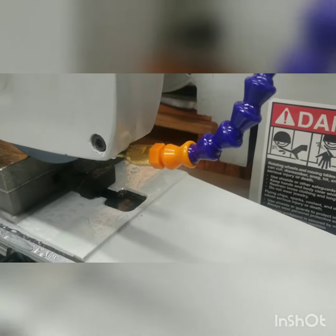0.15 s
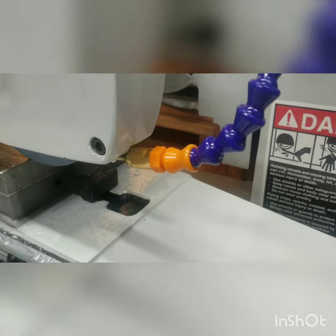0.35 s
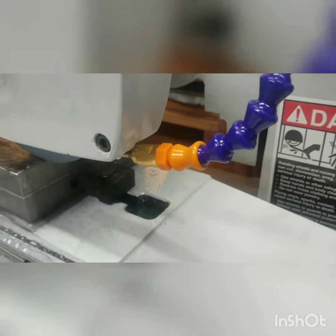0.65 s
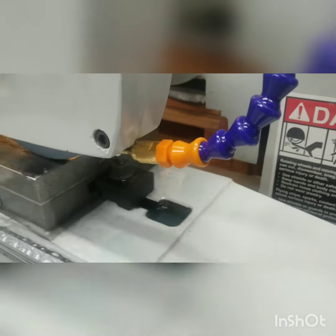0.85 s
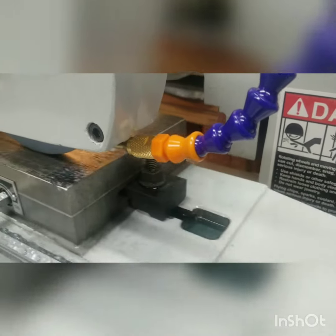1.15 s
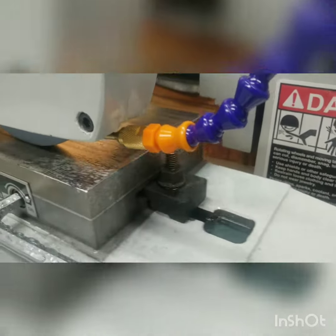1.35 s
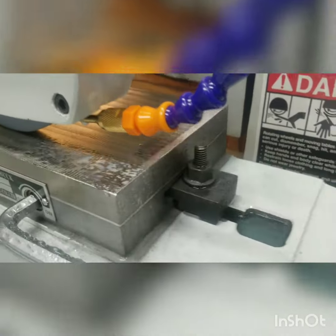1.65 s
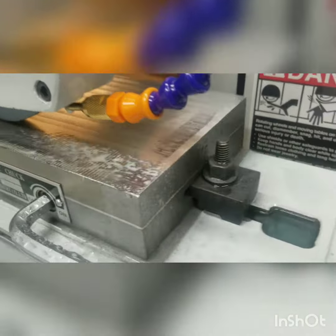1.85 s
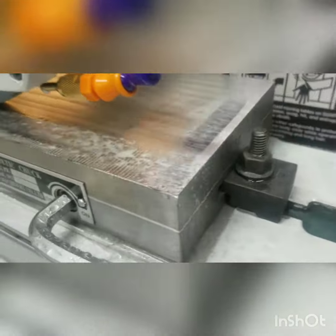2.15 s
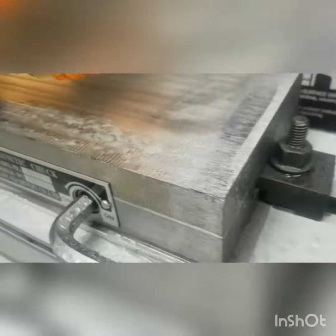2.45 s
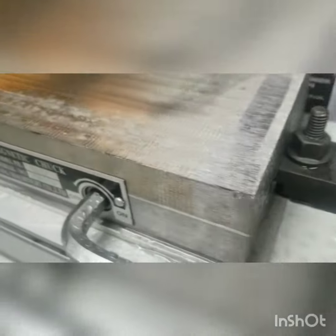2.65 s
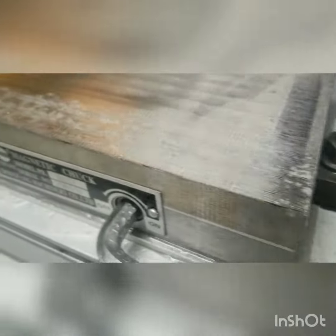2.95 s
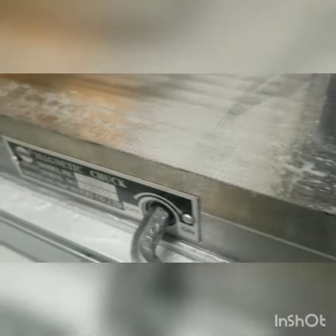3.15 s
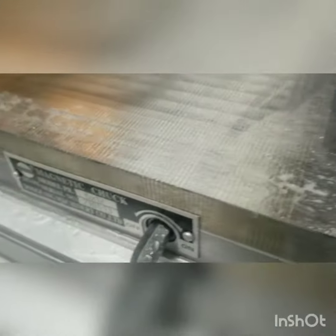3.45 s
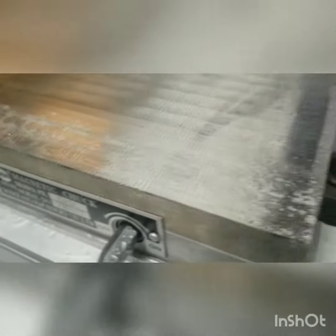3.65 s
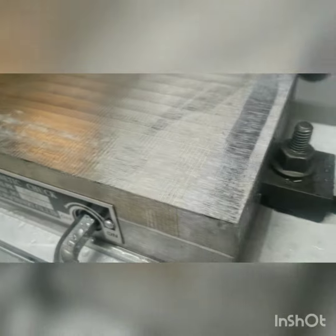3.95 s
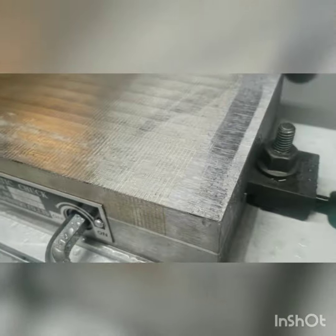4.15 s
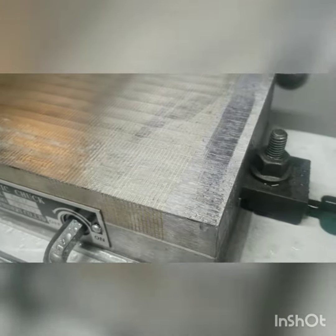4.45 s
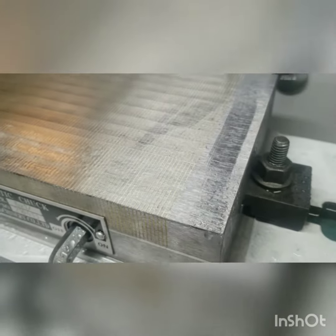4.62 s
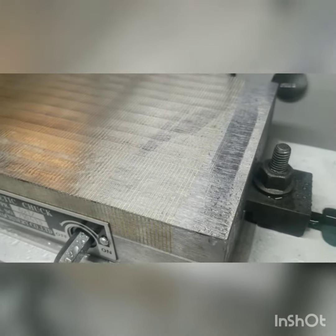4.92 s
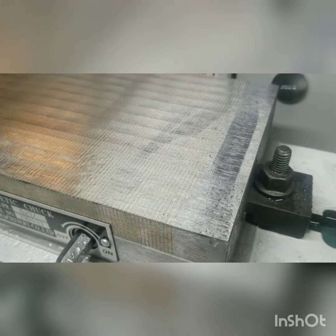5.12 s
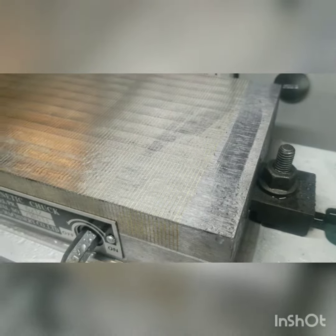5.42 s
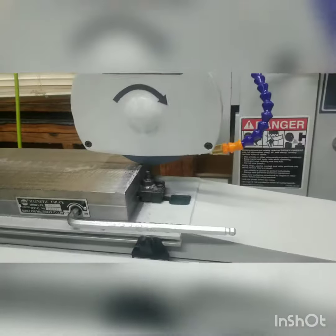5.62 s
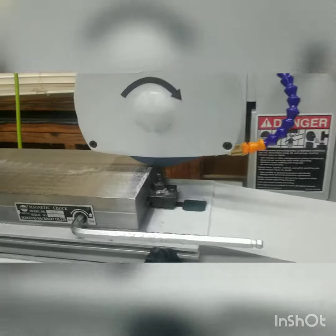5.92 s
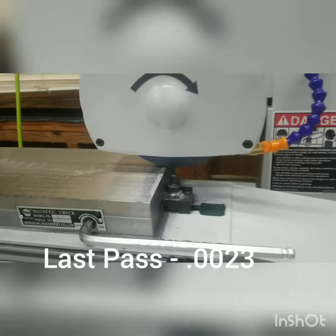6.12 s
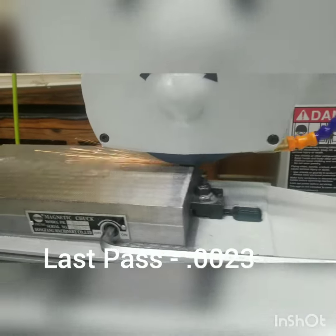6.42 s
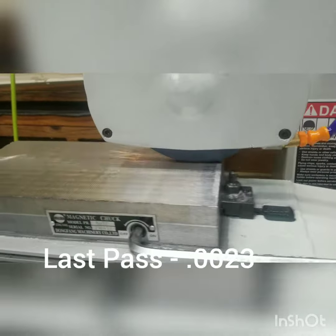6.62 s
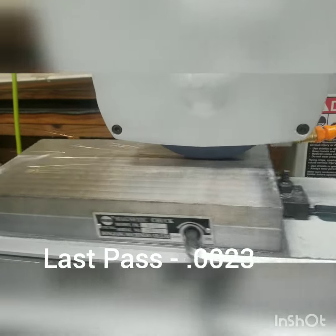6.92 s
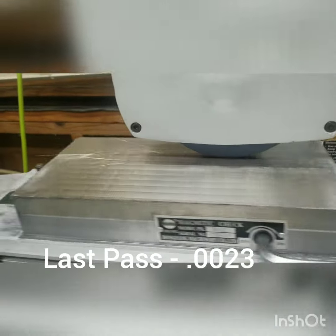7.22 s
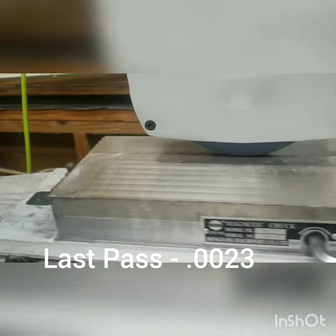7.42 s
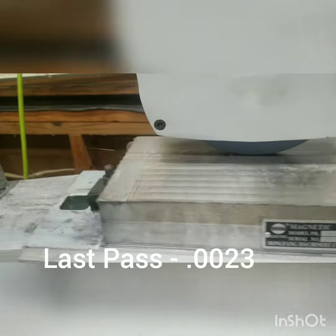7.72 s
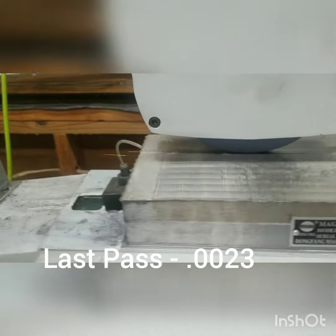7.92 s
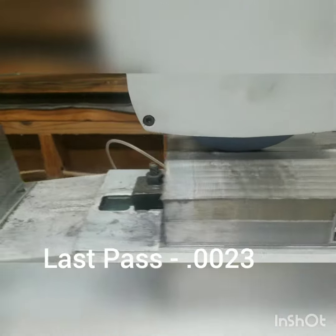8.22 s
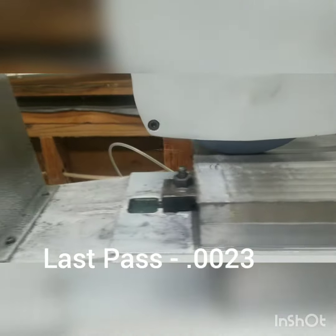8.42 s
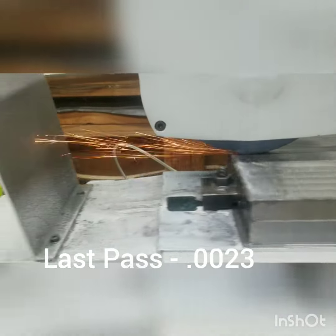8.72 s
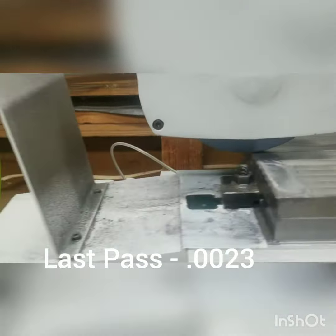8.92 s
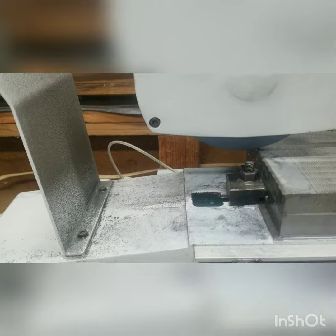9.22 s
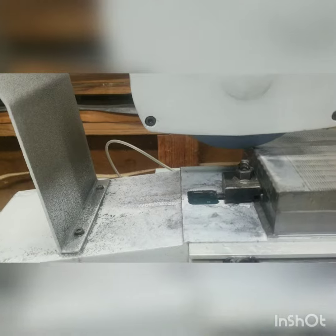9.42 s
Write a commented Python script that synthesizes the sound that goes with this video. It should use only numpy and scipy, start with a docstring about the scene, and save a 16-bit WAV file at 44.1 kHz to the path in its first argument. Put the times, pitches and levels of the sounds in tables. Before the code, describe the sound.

Close, moving stereo microphone beside a running grinding machine. Dense hiss and steady bearing whine shift in colour as the microphone turns. A table motor glides up to a thin whine and back down, with a low growl coming and going. Two long cuts add ringing, fluctuating high tones and a slight drop in spindle pitch. A blink of silence separates the two viewpoints.

```python
"""Surface grinder at work

A grinder in a workshop is heard from two places, with a very short silence between them. Shaped noise makes
the rumble, fan, wheel rush and the hiss of an air nozzle. Gliding sines make the whine of the table drive,
which rises and falls with each stroke, and a growl. More sines make the spindle's song, which sags in pitch
while the wheel cuts. Two microphone ports hear it all as the microphone moves about near the machine."""
import sys
import numpy as np
from scipy import signal
from scipy.fft import rfft, irfft, next_fast_len
from scipy.io import wavfile
from scipy.ndimage import uniform_filter1d, map_coordinates

SR = 44100
rng = np.random.default_rng(int(sys.argv[2]) if len(sys.argv) > 2 else 0)


def put_to_file(sound):
    """Save the sound as 16-bit audio at rate SR, in the file named by the first command-line argument."""
    columns = np.atleast_2d(sound).T  # one column per channel
    safe = np.clip(columns, -1, 1)
    whole_steps = np.round(safe * 32767)
    wavfile.write(sys.argv[1], SR, whole_steps.astype(np.int16))


N = 422037
TIME = np.arange(N) / SR
MOVE_S = 5.48  # change from the first place to the second
STOP_S, RESUME_S = 5.447, 5.508  # the short silence


def amp(db):
    """Gain of a level in dB."""
    return 10 ** (np.asarray(db) / 20)


def ramp(start, length, t=TIME):
    """0 before start, 1 after start + length, straight between."""
    return np.clip((t - start) / length, 0, 1)


def along(points, hz):
    """Read (f/Hz, value) points on a log frequency axis."""
    f, v = np.transpose(points)
    return np.interp(np.log(hz + 1), np.log(f + 1), v)


def curves(rows, t=TIME):
    """Read every column after the first at the places t of the first column."""
    s, *columns = np.transpose(rows)
    return np.array([np.interp(t, s, column) for column in columns])


def wobble(rate):
    """A random curve: straight lines between random points, rate points a second."""
    points = rng.standard_normal(int(N * rate / SR) + 4)
    return map_coordinates(points, [TIME * rate], order=1)


# positions of the microphone: (t/s halfway through the glide there, level/dB of each of 10 guard resonances
# before the hiss boost, level/dB of each of 3 strong bearing tones, level/dB added to the other spindle tones)
POSITIONS = [(0.0, -38, -32, -42, -35.5, -34.5, -37, -40.5, -39, -40, -37, -40, -32, -38, -1.8),
             (0.35, -36.5, -30.5, -39, -39, -32.5, -37, -42, -35.5, -39.5, -37, -42.5, -28.5, -35, -0.34),
             (0.6, -39, -32, -33, -37, -34.5, -41, -39.5, -37, -38, -34, -38, -37, -36, -1.5),
             (0.8, -39, -39, -43, -38, -28.5, -34, -39, -37, -41, -34, -36, -37, -30, 0.8),
             (1.0, -39, -37, -34, -34, -35, -40, -36, -42, -39, -38.5, -43, -41, -36, 0.77),
             (1.3, -36.5, -35.0, -37, -30.5, -39, -41.5, -36, -48, -39, -39, -43, -34.5, -30, 1),
             (1.9, -38, -33.5, -33, -41, -33, -47, -38.5, -38, -41.0, -36.0, -36, -35, -33.5, 0.2),
             (2.3, -40, -32.5, -32, -46, -31.5, -63, -38.5, -37.5, -45, -37, -37, -46, -36, -1.4),
             (2.75, -40, -34.5, -29, -36, -33, -39.5, -38.5, -39.5, -42, -37.0, -39, -53, -38.5, 0.0),
             (3.25, -40, -38, -29.5, -33.5, -38, -40, -43, -37.5, -42, -38, -40, -42.5, -48.0, -1),
             (3.8, -39, -37.5, -30.5, -34, -41, -40.5, -44, -37, -43, -41, -41.5, -50, -46, -0.9),
             (5.48, -39, -36.5, -43, -41.5, -44, -49, -42, -42.5, -43, -43, -48, -36.5, -39, -3.5),
             (6.4, -43, -39, -39, -43, -41.5, -41.5, -41, -40.5, -41, -40, -41, -34.5, -35, -1.5),
             (6.95, -37.5, -34, -35.5, -40, -40, -40.5, -40, -38, -47, -40, -35, -38, -31, -1.1),
             (7.45, -38, -34, -36.5, -42, -36, -42.5, -39.5, -41.5, -40, -42, -46, -39, -31.5, 0),
             (7.9, -39, -35.5, -35.0, -44, -39, -43.5, -40, -42, -37.5, -43.5, -47, -36.5, -34.5, 0.5),
             (8.5, -50, -32, -35.5, -38, -41, -42.5, -42.5, -43, -37, -42.5, -45, -43.5, -36.5, 1.4),
             (8.95, -49, -33, -34.5, -41, -41, -44.5, -44.5, -46.5, -49, -42.5, -44, -41.5, -36, 0.9)]
HISS, BEARING, OTHERS = slice(1, 11), slice(11, 14), slice(14, 15)  # columns of the positions
GLIDE_S = .19  # from one position to the next


def heard(columns):
    """Some columns of the positions over time: hold, then glide; the change of place is almost a jump."""
    rows = []
    for before, now in zip(POSITIONS, POSITIONS[1:]):
        half = GLIDE_S / 2 if abs(now[0] - MOVE_S) > .05 else .01
        rows.append((now[0] - half, *before[columns]))
        rows.append((now[0] + half, *now[columns]))
    return rows


# how far the left port leads before the bass is reduced: (f/Hz, phase/rad for each of 9 microphone aims)
LEAD = [(0, 0, 0.5, 0.5, -1.5, 2.5, 0.5, -1.5, -0.5, 1.5),
        (1200, 2.5, 2.2, 2.5, -2.5, 2.06, 0.8, 0.5, 1.1, -2.0),
        (2060, 5, 5, 1, -5.5, 5.5, -0.7, -0.3, -2.1, 2),
        (2612, 4.5, 4.5, -3.5, -5, 2, -2.5, -1.8, -1.5, -1.5),
        (3170, 4.5, 4, -1.5, -8, 0.9, -2, 2.5, 1.4, -2), (3476, 3.5, 7, -2, -5, -0.3, -3.5, -2, 4.5, 0.5),
        (3770, 8.0, 7.5, 3.5, -4.5, 3.5, -2, 1.5, 1.0, 1.3),
        (3900, 10, 7, -1.2, -5.5, 1.8, -0.6, 1.5, -1.4, 2.5),
        (4230, 10, 11, -0.5, -2, -3, -3, -4.5, -3.5, 2),
        (4710, 12, 14, 0.5, -3.5, -1.9, 0.5, -2, -3.5, 2.0),
        (4880, 10.5, 10.5, -2.5, -3, 0.1, 0.7, -2.5, -4, 1), (5390, 9, 7, -1.5, -1, -1, 2.1, -1, -4.5, 0.5),
        (5470, 8, 8.5, -4, -2.5, 2.5, -2.5, 2, -1.5, 3), (6355, 12.5, 7, -0.3, -0.8, -2.4, 1.5, 1, -4, 0),
        (6900, 7, 5, -3, 1.2, 1.5, -0.5, 4.5, -5, -1.5), (9700, 10.5, 2, -2, 1.1, 1.5, -2.5, 0.5, -5, -2),
        (11320, 14.5, -1, -5, 2, -6.5, -4, 3, -3, -2.5), (12170, 13.5, 2.5, -8, 5, -3.5, -5, -2, -11, 0.5),
        (13100, 16, -3, -7.5, 5, -4, -5, 0, -11.5, 3.5),
        (15200, 20, -1.5, -8, 4.5, -7.2, -0.5, -10, -11, 4)]
# turns from one aim to the next: (start t/s, length t/s)
TURNS = [(.5, .2), (.9, .25), (1.7, .4), (3.05, .45), (5.46, .03), (6.25, .2), (6.95, .25), (8.3, .3)]


def lead(hz, t):
    """Phase lead of the left port as the microphone turns; the bass comes from the front and has little."""
    aims = np.exp(1j * curves(LEAD, hz) * hz ** 2 / (hz ** 2 + 500 ** 2))
    steps = sum((b - a) * ramp(*turn, t) for a, b, turn in zip(aims, aims[1:], TURNS))
    return np.angle(aims[0] + steps)


# how alike left and right noise are: (f/Hz, likeness from 0 to 1)
ALIKE = [(40, .72), (80, .62), (150, .9), (400, .9), (800, .65), (1500, .4), (3000, .6), (5000, .74),
         (9000, .58), (15000, .62)]
RIPPLE_DB = 2.5  # depth of the treble ripples


def noise(shapes, levels, patchy_db, streaky_db):
    """Stereo noise: each spectral shape follows its level curve, with random patches, streaks and ripples."""
    hz, t, z = signal.stft(rng.standard_normal((2, N)), SR, nperseg=1024)
    power = np.array([shape(hz) ** 2 for shape in shapes])
    power = power / power.mean(axis=1, keepdims=True)
    gain = np.sqrt(power.T @ amp(curves(levels, t)) ** 2)
    white = rng.standard_normal((4, *z.shape[1:]))

    # patches come and go; their slow swells are taken out
    patches = uniform_filter1d(uniform_filter1d(white[0], size=12, axis=0), size=10, axis=1)
    patches = patches - uniform_filter1d(patches, size=36, axis=1)

    # echoes from near surfaces: narrow, longer streaks, a little different in each port, without broad swells
    streaks = white[1:3] + white[1:3].sum(axis=0)
    streaks = uniform_filter1d(uniform_filter1d(streaks, size=2, axis=1), size=50, axis=2)
    streaks = streaks - uniform_filter1d(streaks, size=9, axis=1)
    gain = gain * amp(patchy_db * patches / patches.std() + streaky_db * streaks / streaks.std())

    # wider ripples drift slowly in the treble
    ripples = uniform_filter1d(uniform_filter1d(white[3], size=9, axis=0), size=40, axis=1)
    ripples = ripples - uniform_filter1d(ripples, size=36, axis=0)
    treble = ramp(7000, 2500, hz)[:, None]
    gain = gain * amp(RIPPLE_DB * treble * ripples / ripples.std())

    # mix a shared and an opposite part to get the likeness, then shift the phase of one port
    spread = np.arccos(np.clip(along(ALIKE, hz), 0, 1))[:, None] / 2
    mid, side = z[0] * np.cos(spread), z[1] * np.sin(spread)
    shift = np.exp(1j * lead(hz[:, None], t[None]))
    ports = gain * np.array([(mid + side) * shift, mid - side])
    return signal.istft(ports, SR, nperseg=1024)[1][:, :N]


def tone(hz, db, near_hz, waver_db, rate=5):
    """A stereo sine wavering apart in each port; the phase between them follows the lead and drifts at random."""
    phase = 2 * np.pi * (np.cumsum(hz) / SR + rng.random())
    steps = TIME[::256]
    half = np.interp(TIME, steps, np.unwrap(lead(near_hz, steps))) / 2
    half = half + .25 * wobble(1.2) * near_hz / (near_hz + 1500)
    ports = [amp(db + waver_db * wobble(rate)) * np.sin(phase + side * half) for side in (1, -1)]
    return np.sqrt(2) * np.array(ports)


# passes of the wheel over the steel: (enters t/s, leaves t/s, early sag f/Hz, late sag f/Hz)
CUTS = [(.6, 3.05, 2.5, 1.6), (6.32, 8.75, 3.7, 1.9)]
FREE_HZ, FULL_SAG_HZ = 288.45, 1.5  # ball pass rate running free; the drop that counts as full load
SAG_S, RECOVER_S = .16, .2


def ball_pass():
    """Ball pass rate of the bearing: it sags as the wheel enters, creeps back, recovers as the wheel leaves."""
    rate = FREE_HZ
    for enters, leaves, early, late in CUTS:
        sag = early + (late - early) * ramp(enters, leaves - enters)
        rate = rate - sag * ramp(enters, SAG_S) * (1 - ramp(leaves, RECOVER_S))
    return rate


def load():
    """0 running free, 1 cutting: the motor slips more under the cut."""
    return np.clip((FREE_HZ - ball_pass()) / FULL_SAG_HZ, 0, 1)


# noise spectra of floor, machine base, fan and wheel; only the shape counts: (f/Hz, relative level/dB)
FLOOR = [(15, -38), (30, -20), (60, -7), (100, -10.5), (150, -9), (200, -8), (300, -120)]
BASE = [(100, -62), (160, -21.5), (227, -1.5), (318, -6.5), (409, -1), (500, -14.5), (650, -25),
        (1100, -120)]
FAN = [(250, -61), (450, -1.5), (550, -3.5), (800, -2.5), (1200, -6), (1450, -16), (2500, -27)]
RUSH = [(900, -66), (1300, 6), (1560, 12.5), (1780, 6), (2200, 11.5), (2450, 11.5), (3000, 11), (7000, -42),
        (8300, -41), (10000, -29), (16500, -31)]
# one row each for floor, base, fan and rush, before the boost: (level/dB at first place, level/dB at second)
MOTOR_LEVELS = [(-66, -67.5), (-49, -50), (-47.5, -47.5), (-45, -46.5)]
# extra just after the change of place: (level/dB of floor, of base, of fan, of rush)
SETTLE = (10, -4, 0.5, 0)
SETTLE_S = 0.98  # time in which the extra fades


def motor():
    """Rumble of floor and base, the fan and the wide rush of the wheel, all as shaped noise."""
    shapes = [lambda f, s=s: amp(along(s, f)) for s in (FLOOR, BASE, FAN, RUSH)]
    first, second = np.transpose(MOTOR_LEVELS)
    levels = [(STOP_S, *first), (RESUME_S, *(second + SETTLE)), (RESUME_S + SETTLE_S, *second)]
    return amp(8.0) * noise(shapes, levels, patchy_db=1.2, streaky_db=2.0)  # 8 dB boost


# table strokes, one list for each place: (starts t/s, stands still t/s, full whine f/Hz, braking t/s,
# level/dB gaining speed, level/dB at full speed, level/dB braking)
STROKES = [
    [(.14, 3.49, 4003, .47, -39.5, -45, -46), (3.53, 6.5, 2003, .47, -42.5, -38.5, -39)],
    [(4, 6.01, 2003, .9, -39.5, -39.5, -38), (5.883, 9.24, 4003, .47, -42, -50, -46),
     (9.256, 12, 2003, .47, -42, -42, -42)],
]
RISE_S, RISE_HZ = .72, 4003  # time to reach this whine; other times go with the root of the full whine
WAKE_SHARE, WAKE_DB = .4, 40  # a starting drive is softer below this share of speed; dB per full speed
DIP_S, DIP_WIDTH_S, DIP_DB = 4.82, .22, -12  # the steady whine dips briefly: centre, half its length, depth


def table_travel():
    """Whine pitch and level of the drive: each stroke gains and loses speed along an S-curve."""
    def ease(u):
        return u * u * (3 - 2 * u)

    hz, db = np.zeros(N), np.zeros(N)
    for here, strokes in zip((TIME < MOVE_S, TIME >= MOVE_S), STROKES):
        for start, stop, top, brake, rise_db, full_db, brake_db in strokes:
            up = ease(ramp(start, RISE_S * np.sqrt(top / RISE_HZ)))
            down = ease(ramp(stop - brake, brake))
            level = rise_db + (full_db - rise_db) * up ** 10
            level = level + (brake_db - full_db) * np.minimum(4 * down, 1)
            level = level + WAKE_DB * np.minimum(up - WAKE_SHARE, 0)
            whine_hz = top * up * (1 - down)
            fastest = here & (whine_hz > hz)  # where strokes overlap, the higher whine wins
            hz, db = np.where(fastest, whine_hz, hz), np.where(fastest, level, db)
    dip = np.clip(2 - 2 * np.abs(TIME - DIP_S) / DIP_WIDTH_S, 0, 1)
    return hz, np.where(hz > 0, db, -90) + DIP_DB * dip


# the whine and its multiples: (multiple, relative level/dB at steady speed)
DRIVE_ORDERS = [(1, 0), (2, -2), (3, -13)]
# resonances of the drive's case: (f/Hz, width f/Hz, relative level/dB)
DRIVE_CASE = [(600, 90, 0), (760, 90, 0), (930, 120, -6), (1650, 100, 2.5), (1860, 90, -3), (2030, 160, 0),
              (2200, 150, 2), (2620, 300, 0), (4003, 400, 0)]
# spells in which the feed screw growls: (from t/s, to t/s, level/dB at start, level/dB at end)
GROWLS = [(0.124, 0.28, -47, -43), (0.76, 1.898, -40, -47), (2.385, 3.6, -50.5, -49),
          (6.49, 6.954, -48, -47.5), (7.747, 9.036, -47, -43.5)]
GROWL_REST_DB, GROWL_EDGE_S = -57.5, 0.037  # level between spells; time to come and go


def drive():
    """The whine and its multiples light up as they cross the resonances of the case; the screw growls."""
    def case_db(f):
        bumps = sum(amp(2 * g) / (1 + (2 * (f - c) / w) ** 4) for c, w, g in DRIVE_CASE)
        return 10 * np.log10(bumps + .025)

    hz, db = table_travel()
    # while the table gains or loses speed the motor cogs: pitch and level turn rough, the multiples fall back
    rough = np.clip(np.abs(np.gradient(hz)) * SR / 2000, 0, 1)
    hz = hz + 40 * rough * wobble(120)
    db = db + 3 * rough * wobble(50)
    whine = 0
    for multiple, relative_db in DRIVE_ORDERS:
        level = db + relative_db * (1 + 2 * rough) + case_db(multiple * hz)
        whine = whine + tone(multiple * hz, level, 350, waver_db=1.7, rate=14)

    growl_db = GROWL_REST_DB
    for start, end, first, last in GROWLS:
        above_rest = first + (last - first) * ramp(start, end - start) - GROWL_REST_DB
        present = ramp(start - GROWL_EDGE_S, GROWL_EDGE_S) - ramp(end, GROWL_EDGE_S)
        growl_db = growl_db + above_rest * present
    growl = tone(221 + 1.67 * wobble(7.2), growl_db, 150, waver_db=0.2)
    return whine + growl


# resonances of guard and chuck that colour the air jet: (f/Hz, width f/Hz)
GUARD = [(3550, 800), (4200, 620), (4810, 420), (5330, 470), (6050, 900), (6900, 700), (10300, 2000),
         (12100, 1700), (13600, 1400), (15200, 1800)]
FLUTTER_HZ = 237.4  # middle rate of the nozzle's own flutter
SHAFT_SHARE = 1 / 4.853  # shaft turns per ball pass


def air_jet():
    """Hiss in the guard's resonances; the nozzle flutters, the wheel, never quite round, throbs once a turn."""
    # many close modes merge into broad, flat-topped bands with steep flanks
    shapes = [lambda f, c=c, w=w: (1 + (2 * (f - c) / w) ** 4) ** -.5 for c, w in GUARD]
    hiss = amp(4.0) * noise(shapes, heard(HISS), patchy_db=1.36, streaky_db=3)  # 4 dB boost
    flutter_phase = 2 * np.pi * np.cumsum(FLUTTER_HZ + .5 * wobble(3.7)) / SR
    flutter = np.where(TIME < MOVE_S, .22, .02) * np.sin(flutter_phase)
    turn = 2 * np.pi * np.cumsum(ball_pass() * SHAFT_SHARE) / SR
    throb = (0.018 + 0.025 * load()) * np.sin(turn)
    return hiss * (1 + flutter + throb) * amp(0.54 * wobble(9))


# orders of shaft and bearing with their sidebands, before the change with position: (f/Hz running free,
# level/dB free and level/dB cutting at the first place, level/dB free and level/dB cutting at the second)
TONES = [(59.4, -63, -61, -70, -69), (119, -64, -66, -70, -80), (357, -48, -47, -45, -48),
         (379, -50, -63, -69, -67), (475, -70, -62, -68, -49), (534, -71, -51, -62, -48),
         (1154, -47, -52, -48, -48), (1190, -50, -52, -46, -49), (1248, -59, -53, -54, -52),
         (1307, -55, -50, -59, -52), (1960, -48, -55, -51, -49), (2079, -47, -51, -46, -52),
         (2189, -62, -49, -65, -56), (2248, -55, -49, -51, -52), (2538, -52, -50, -49, -45),
         (2596, -51, -51, -52, -52), (2656, -50, -50, -48, -44), (2801, -57, -58, -51, -48),
         (2826, -66, -60, -54, -48), (2885, -54, -54, -47, -46), (2944, -55, -51, -47, -46),
         (3810, -48, -48, -45, -47), (4039, -48, -43, -46, -48), (4963, -44, -42, -42, -47),
         (5422, -46, -43, -46, -52)]
# hum of the motor frame, the seventh shaft order and a tone just above it: same columns as the tones
HUM = [(416, -37, -40, -42, -36), (430, -45, -54, -39, -51)]
# change of the hum from start to end of each pass: (level/dB in the first, level/dB in the second)
HUM_FADES = (-2, 0)
# the three strongest bearing tones: (multiples of the ball pass rate)
BEARING_ORDERS = (11, 12, 13)
# tones only loud while the wheel cuts, before the bite:
# (f/Hz at free speed, level/dB at the first place, level/dB at the second)
WHEEL = [(3860, -43, -43), (3920, -34, -35), (3979, -41, -35), (6463, -45, -55), (6523, -43, -46),
         (6594, -56, -43), (7010, -66, -42), (9682, -53, -46), (10276, -51, -56), (11464, -66, -52),
         (11584, -66, -54), (13187, -66, -52), (13959, -68, -44)]
# how hard the wheel bites: (t/s, level/dB added to wheel tones below 5 kHz, level/dB added to those above)
BITE = [(.66, 1, 10.5), (1.2, -5, -3), (1.6, 5.5, 5), (2, -8, 6), (2.5, 1, 5), (2.8, -28, 0),
        (3.05, -15, 3), (6.42, 0, 4), (7.5, 4, 2.5), (7.9, -30, -0.5), (8.8, -18, -6)]
# level tilt of two high wheel tones over the second pass: {f/Hz: level/dB change from entry to exit}
TILTS = {9682: -8, 13187: 8}
TOUCH_S = .05  # the wheel's tones come in this fast and go in twice the time


def spindle():
    """All tones scale with the speed; the cut changes their strengths and wakes the wheel's own."""
    speed, cut, second = ball_pass() / FREE_HZ, load(), TIME > MOVE_S

    def level(row):
        _, free_1, cutting_1, free_2, cutting_2 = row
        return np.where(second, free_2 + cut * (cutting_2 - free_2), free_1 + cut * (cutting_1 - free_1))

    others_db = curves(heard(OTHERS))[0]
    fade_db = 0
    for (enters, leaves, *_), change in zip(CUTS, HUM_FADES):
        fade_db = fade_db + change * ramp(enters, leaves - enters) * (TIME < leaves + RECOVER_S)
    fade_db = cut * fade_db
    sound = sum(tone(row[0] * speed, level(row) + fade_db + others_db, row[0], waver_db=1.86) for row in HUM)

    for order, db in zip(BEARING_ORDERS, curves(heard(BEARING))):
        sound += tone(order * ball_pass(), db, order * FREE_HZ, waver_db=3.0, rate=10)
    for row in TONES:
        sound += tone(row[0] * speed, level(row) + others_db, row[0], waver_db=4.5, rate=9)

    touch = sum(ramp(a + TOUCH_S, TOUCH_S) - ramp(b + TOUCH_S, 2 * TOUCH_S) for a, b, *_ in CUTS)
    lower_db, upper_db = curves(BITE) - 45 * (1 - touch)  # 45 dB down away from the steel
    enters, leaves = CUTS[1][:2]
    along_pass = ramp(enters, leaves - enters) - .3
    for hz, first_db, second_db in WHEEL:
        wheel_db = np.where(second, second_db + TILTS.get(hz, 0) * along_pass, first_db)
        bite_db = lower_db if hz < 5000 else upper_db
        sound += tone(hz * speed, wheel_db + bite_db, hz, waver_db=2, rate=12)
    return sound


AFTER_DB, AFTER_DB_PER_S, FADE_IN_S = -24, -1100, .006  # faint trace dying after the stop; the return


def scene():
    """The whole machine; the sound stops for a moment at the change of place."""
    trace = amp(np.minimum(AFTER_DB + AFTER_DB_PER_S * (TIME - STOP_S), 0))
    gate = np.where(TIME < STOP_S, 1, trace + ramp(RESUME_S, FADE_IN_S) ** 2)
    return (motor() + drive() + air_jet() + spindle()) * gate


# left minus right, one list for each place: (t/s, level/dB below 10 kHz, level/dB from 10 kHz up)
PAN = [
    [(0, 1, 2), (2.7, 1, 1), (3.5, .5, 2.5), (5.44, 0.5, 0.5)],
    [(5.53, 0, -0.5), (8.5, 0, 0), (9.57, -0.5, -2)],
]
TOP_HZ = 15750  # band limit


def record(dry):
    """The ports differ in level, by another amount from 10 kHz up; nothing is kept above the band limit."""
    m = next_fast_len(N + 8192)
    hz, z = np.fft.rfftfreq(m, 1 / SR), rfft(dry, m)
    pan = curves(PAN[0] + PAN[1]) / 2  # half up on one side, half down on the other
    bands = [irfft(z * keep, m)[:, :N] for keep in (hz < 10000, hz >= 10000)]
    ports = sum(band * amp([db, -db]) for band, db in zip(bands, pan))
    return irfft(rfft(ports, m) * (hz < TOP_HZ), m)[:, :N]


dry = scene()
out = record(dry)
put_to_file(out)
```